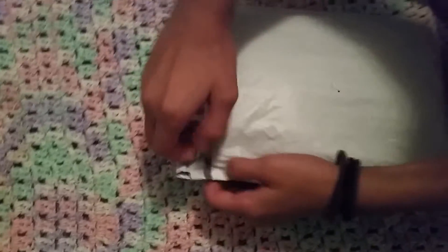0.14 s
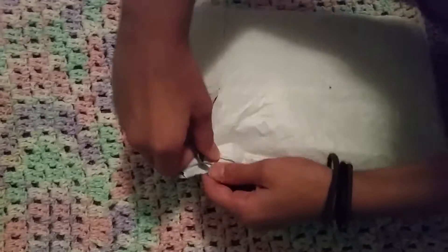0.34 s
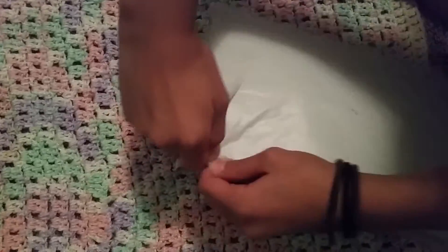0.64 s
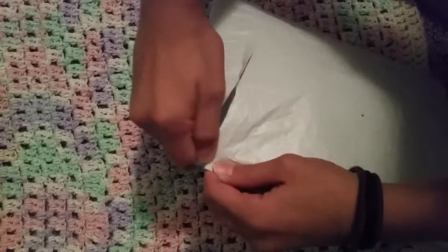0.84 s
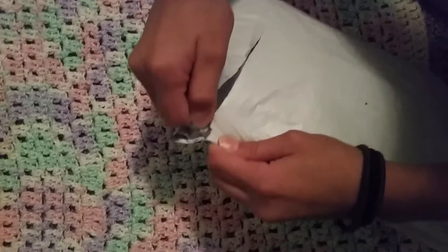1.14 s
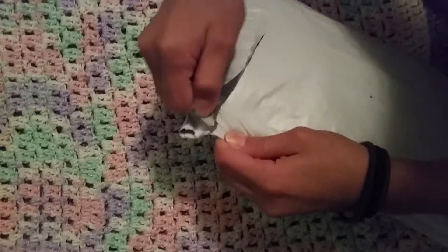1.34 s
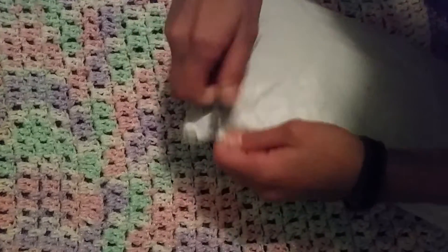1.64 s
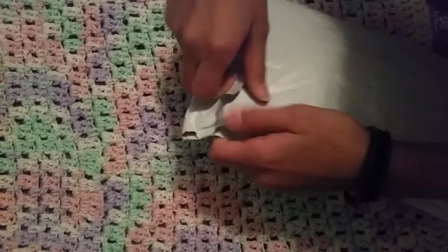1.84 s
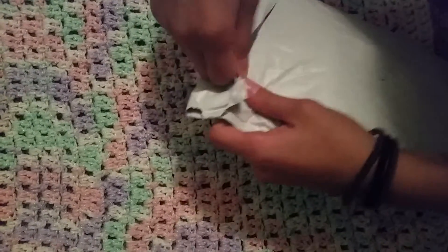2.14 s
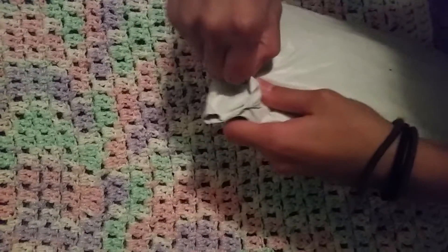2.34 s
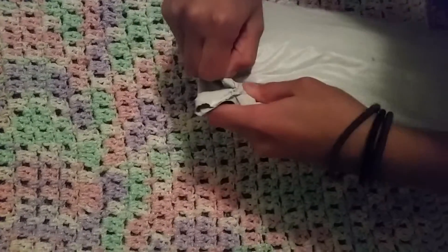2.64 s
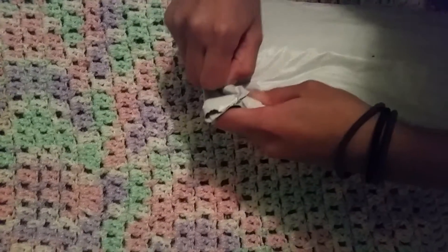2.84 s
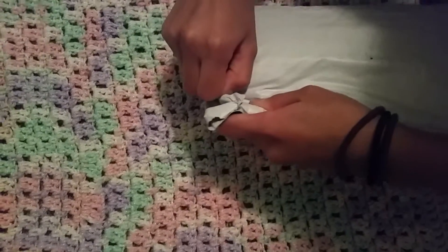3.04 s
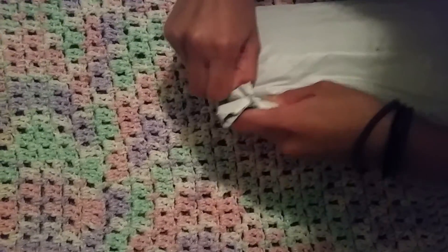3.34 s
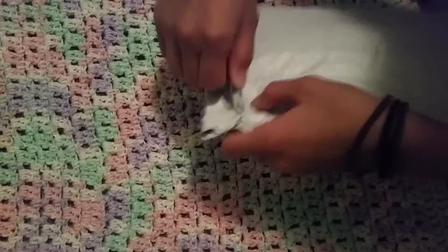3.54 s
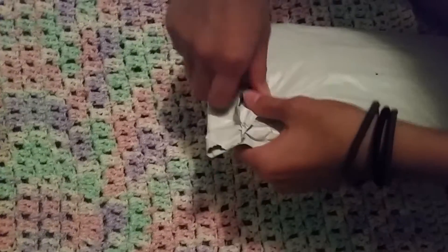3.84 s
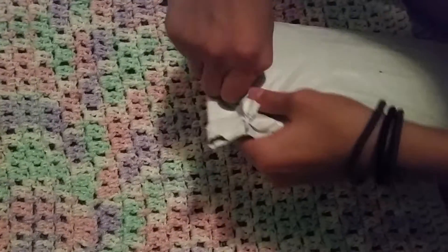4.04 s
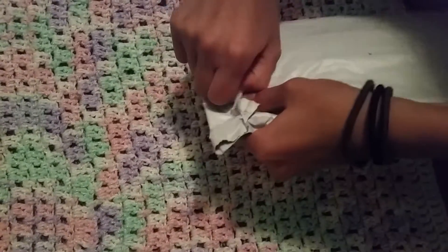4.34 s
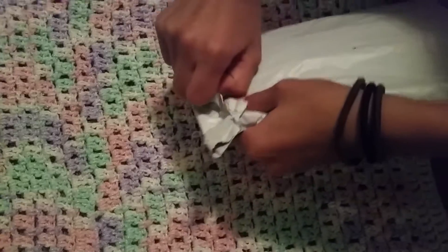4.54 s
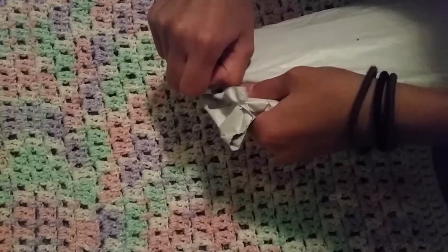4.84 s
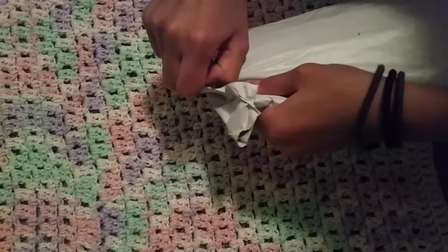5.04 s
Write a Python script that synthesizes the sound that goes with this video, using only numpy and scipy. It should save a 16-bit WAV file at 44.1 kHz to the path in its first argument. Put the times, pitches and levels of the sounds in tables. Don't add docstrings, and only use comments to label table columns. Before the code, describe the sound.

Close to a phone in a quiet room, fingers work the corner of a padded plastic envelope on a blanket. Dry rustling and tiny crackles run unevenly, with a sharp cluster near 0.7 seconds, a calmer spell, then a strong creaking tug and snaps just after 2 seconds. Fine crinkles follow, another hard burst comes near 4 seconds, and lighter ticking continues to the end over faint hum.

```python
import sys
import numpy as np
from scipy import signal
from scipy.fft import rfft, irfft
from scipy.io import wavfile

SR = 44100
rng = np.random.default_rng(int(sys.argv[2]) if len(sys.argv) > 2 else 0)


def decibels_to_gain(level_db):
    exponent = np.asarray(level_db, float) / 20
    return 10 ** exponent


def dump_mix(stems):
    frames = np.atleast_2d(stems).T
    limited = np.clip(frames, -1, 1)
    pcm = np.round(limited * 32767).astype(np.int16)
    wavfile.write(sys.argv[1], SR, pcm)


N = 229577

# low_hz, high_hz
BANDS_HZ = [
    (3400, 11000),
    (11000, 17000),
    (950, 3400),
    (220, 950),
]
# start_s, body_db, sizzle_db, knock_db, pitch_hz
LOUD_SNAPS = [(.1722, -27, -28, -38, 5750), (.233, -26, -24, -45, 7100), (.693, -18.5, -16, -30, 6250),
              (.7052, -21, -15.5, -26.5, 7260), (.7275, -42, -10, -53, 8800), (1.74, -38, -15.5, -36, 6600),
              (1.9271, -24.5, -24, -34.5, 7100), (2.214, -15, -15, -47, 6840),
              (2.2203, -11.5, -21, -26.5, 4860), (2.3, -18.5, -39, -43, 6340),
              (2.4976, -23.5, -23, -34, 9000), (2.8621, -25, -25, -39, 9050), (3.0201, -27, -32, -24, 7050),
              (3.1536, -21, -21, -32.5, 6000), (3.6026, -21.5, -19, -37.5, 7150),
              (3.6513, -31, -14, -38, 7160), (4.0256, -16, -20, -25.5, 6170),
              (4.0354, -15.5, -18, -34, 5700), (4.0443, -19.5, -29, -26.5, 5500),
              (4.0717, -15, -7.5, -61, 8950), (4.0976, -27, -20, -33, 7300),
              (4.3993, -23.5, -22, -35, 7200), (4.6054, -16, -21.5, -60, 6500),
              (4.9628, -15, -17.5, -30.5, 6600)]
# start_s, film_db, knock_db
CRACKS = [(0.182, -36, -35), (0.4333, -45, -38.5), (0.5563, -25, -58), (.634, -23, -36), (0.682, -24, -47),
          (0.7694, -30, -43), (0.899, -37, -31), (.996, -29.5, -25.5), (1.022, -35, -36), (1.032, -31, -45),
          (1.0648, -27.5, -39), (1.114, -31, -44), (1.1975, -33.5, -33), (1.594, -32, -36.5),
          (1.769, -42, -40), (1.9723, -27, -36), (2.114, -39, -42), (2.165, -22, -37), (2.227, -28, -52),
          (3, -36, -42), (3.0593, -29, -30.5), (3.068, -28.5, -53), (3.093, -28.5, -52), (3.3735, -25, -39),
          (3.8867, -27, -60), (3.8948, -26.5, -34.5), (4.0503, -20.5, -35), (4.1056, -28, -40),
          (5.013, -21.5, -37), (5.126, -23, -43)]
# start_s, body_db, knock_db
MUFFLED = [(0.074, -50, -34), (0.101, -39, -34), (0.356, -60, -40), (.403, -32.5, -37), (0.976, -48, -33),
           (1.126, -36, -68), (1.7023, -48, -33.5), (1.904, -27, -46), (2.2446, -28, -45),
           (2.353, -42, -32), (2.4103, -43, -34), (2.4283, -46, -29), (2.5618, -50, -30.5),
           (2.783, -47, -35), (2.8913, -26, -37), (2.953, -50, -35), (3.2204, -29.5, -35.5),
           (3.3567, -23, -46), (3.4923, -60, -32.5), (3.9163, -39, -33.5), (4.1607, -49, -40),
           (4.329, -43, -36.5), (4.6718, -30, -35.5), (4.7547, -31, -41), (4.877, -41, -37),
           (4.937, -27, -60), (5.0858, -31, -37.5), (5.1463, -27, -39), (5.153, -26, -48),
           (5.204, -24, -38)]
# start_s, sizzle_db
SPARKS = [(.017, -25.5), (0.538, -26), (0.991, -38), (1.2735, -27), (2.082, -19.5), (2.106, -19),
          (2.1806, -27), (2.182, -31), (2.461, -20.5), (2.585, -23), (2.6978, -24), (3.136, -17.5),
          (3.1798, -22), (3.584, -27), (3.601, -23), (3.6763, -28), (3.9007, -27), (4.0798, -17),
          (4.346, -27), (4.651, -30), (5.1728, -26), (5.187, -31)]
# start_s, peak_db
KNOCKS = [(0.0568, -41), (0.1815, -25.5), (0.209, -38), (0.4294, -33.5), (0.9157, -30.5), (1.042, -37),
          (1.1068, -43), (1.142, -42), (1.3692, -41), (1.439, -41), (1.499, -38), (1.5545, -38),
          (1.6356, -33), (1.8178, -59), (1.8512, -56), (2.071, -30), (2.083, -43), (2.2417, -38),
          (2.275, -34), (2.2907, -30), (2.3218, -25.5), (3.7818, -33), (3.834, -39.5), (3.8492, -39),
          (3.8768, -41), (4.001, -45), (4.151, -34), (4.274, -36), (4.4194, -35), (4.4459, -33)]
# start_s, peak_db
TICKS = [(0.251, -27), (.5663, -34), (0.957, -25), (1.2378, -27), (1.498, -46), (2.1284, -34),
         (2.1993, -16), (2.511, -28), (2.522, -29), (3.217, -30), (3.232, -27), (4.148, -30), (4.1807, -33),
         (4.191, -27.5), (4.235, -36), (4.323, -31), (4.585, -25), (4.693, -23), (4.7352, -26.5),
         (4.854, -30), (4.916, -31), (4.941, -41), (4.994, -29), (5.029, -25), (5.067, -31), (5.0436, -34),
         (5.0543, -29), (5.1063, -39), (4.9762, -33)]
# start_s, body_db, sizzle_db
FINE = [(0.0339, -36, -43), (0.1647, -33.5, -41), (0.2997, -39, -44), (0.3307, -40, -31),
        (0.4749, -39, -41), (0.577, -37, -38), (0.67, -30, -42), (0.718, -41, -26), (0.8067, -41, -43),
        (0.843, -45, -48), (0.8513, -40, -40), (0.8536, -36, -43), (0.9282, -30.5, -46), (0.9342, -34, -40),
        (1.0068, -45, -38), (1.0423, -31, -38), (1.0917, -42, -44), (1.178, -37, -52), (1.1851, -45, -46),
        (1.2096, -34, -46), (1.2998, -45, -49), (1.3413, -44, -51), (1.6216, -38, -40), (1.6256, -38, -44),
        (1.6393, -46, -42), (1.6562, -53, -44), (1.807, -50, -45), (1.8287, -54, -50), (1.842, -37, -32),
        (1.9597, -40, -39), (2.0474, -31, -37), (2.115, -30, -27), (2.276, -36, -45), (2.3538, -27, -40),
        (2.4087, -36, -33), (2.632, -28, -34), (2.6603, -34, -36), (2.698, -30, -33), (2.7415, -30, -42),
        (2.7641, -38, -37), (2.8158, -30, -34), (2.8296, -37, -46), (2.8428, -41, -44), (2.9333, -33, -32),
        (2.9872, -40, -42), (3.0366, -28, -45), (3.0403, -27.5, -36), (3.0817, -37, -31), (3.087, -34, -39),
        (3.1744, -40, -42), (3.243, -38, -41), (3.3246, -42, -41), (3.4503, -48, -50), (3.4826, -43, -47),
        (3.5151, -38, -49), (3.8773, -25, -36), (3.8835, -30, -43), (4.0773, -29, -26), (4.1068, -27, -29),
        (0.0051, -32.5, -43), (0.5658, -44, -35), (0.647, -38, -32), (0.9908, -48, -34),
               (1.1621, -52, -45), (1.4019, -41, -43), (1.5425, -39, -29), (1.6932, -42, -35),
               (1.962, -37, -34), (2.1837, -34, -19), (2.5861, -32, -26), (2.6128, -42, -31),
               (2.796, -45, -33), (3.016, -28, -32), (3.275, -47, -43), (3.4182, -39, -36),
               (3.4315, -45, -42), (3.457, -42, -47), (3.4739, -54, -43), (3.649, -31, -22),
               (3.7273, -48, -37), (3.7429, -37, -40), (3.792, -31, -40), (3.8906, -28, -32),
               (3.9276, -42, -37), (3.9624, -37, -28), (3.982, -35, -35), (4.023, -39, -35),
               (4.0869, -27, -23), (4.2014, -47, -44), (4.219, -40, -46), (4.232, -40, -32),
               (4.2443, -42, -44), (4.2547, -41, -44), (4.263, -45, -41), (4.2969, -45, -40),
               (4.2971, -46, -43), (4.3227, -40, -34), (4.3596, -40, -44), (4.416, -37, -43),
               (4.4361, -40, -44), (4.4674, -42, -46), (4.4929, -50, -52), (4.558, -35, -43),
               (4.574, -33.5, -37), (4.5914, -48, -43), (4.6296, -48, -44), (4.6512, -32, -38),
               (4.7143, -40, -48), (4.7438, -30, -50), (4.7802, -35, -47), (4.7863, -38, -50),
               (4.792, -42, -56), (4.8101, -43, -53), (4.8379, -36, -46), (4.8642, -33, -61),
               (4.8716, -44, -49), (4.9034, -50, -45), (4.9035, -51, -45), (4.943, -35, -44)]
# start_s, knock_db
DENTS = [(0.0604, -41), (0.0962, -34.5), (0.2715, -40), (0.2994, -39), (0.337, -43), (0.4631, -42),
         (0.6054, -40), (0.647, -32), (0.7532, -40), (0.8546, -56), (1.148, -45), (1.4013, -45),
         (1.417, -46), (1.6716, -50), (1.735, -34), (1.901, -39), (2.0368, -45), (2.0446, -43),
         (2.0743, -40), (2.082, -40), (2.1637, -24), (2.3563, -38), (2.4607, -33), (2.5343, -42),
         (2.6433, -39), (2.6594, -33.5), (2.7322, -39), (2.7415, -33), (2.963, -43), (3.0165, -39),
         (3.0366, -29), (3.094, -44), (3.1798, -43), (3.3146, -49), (3.3679, -45), (3.4383, -53),
         (3.6687, -35), (3.879, -43), (4.085, -32.5), (4.4694, -41), (4.608, -42), (4.7788, -45),
         (4.864, -43), (5.1236, -43), (5.1871, -33.5)]
# middle_s, half_length_s, body_db, knock_above_body_db
MOVES = [(0.01, 0.068, -53, -1), (0.212, 0.081, -49, 1.5), (0.446, 0.071, -55.5, 3.5),
         (0.605, 0.082, -52, -3.5), (0.722, 0.086, -46.5, -0.5), (0.912, 0.07, -55.5, 1),
         (1.042, 0.039, -50, -0.5), (1.153, 0.14, -59.5, 2.5), (1.552, 0.066, -51.5, -1.5),
         (1.747, 0.031, -50, 0.5), (1.88, 0.33, -57.5, 2.1), (2.238, 0.11, -40.5, 1),
         (2.303, 0.26, -50, -2), (2.547, 0.18, -48.5, -2), (2.69, 0.067, -43.5, -3), (2.83, 0.13, -55, -2),
         (3.025, 0.059, -47, -1.5), (3.17, 0.23, -56, 0.5), (3.53, 0.063, -56, 3.5), (3.654, 0.048, -45, 1),
         (3.766, 0.056, -51, -2), (3.898, 0.03, -45, -3), (3.977, 0.056, -50, -8.5),
         (4.078, 0.031, -40.5, -8), (4.38, 0.28, -53.5, -2.1), (4.704, 0.12, -53.5, -5),
         (5.026, 0.054, -52, -4), (5.2, 0.071, -47, -3)]
# middle_s, change_db
SURGES = [(.01, 0), (.155, 1), (.235, 7), (.258, 1.5), (.39, -6.5), (.47, 0), (.531, 1.5), (.807, -5),
          (.842, -2.5), (0.927, 8), (.961, 2), (1.102, -3), (1.267, -2.5), (1.351, -2), (1.417, 5),
          (1.447, 3), (1.52, 3), (1.593, 3), (1.746, 3.5), (1.85, -8.5), (1.939, 4), (2.015, -3.5),
          (2.044, 3), (2.346, 2.5), (2.585, -4), (2.843, -4), (3.126, -4.5), (3.244, 2), (3.307, -2),
          (3.625, -1.5), (3.663, 4), (3.705, -1.5), (3.776, -1.5), (4.167, 1.5), (4.271, -2), (4.505, -1),
          (4.663, -8), (4.724, -1.5), (4.791, -4), (4.832, -3), (5.139, 1)]
# start_s, level_db
SLIPS = [(.056, -33), (0.182, -32.5), (0.186, -35), (.2, -34.5), (0.2327, -29), (.244, -32.5),
         (0.441, -34.5), (0.458, -37), (0.636, -34.5), (0.683, -36), (1.022, -35.5), (1.754, -29.5),
         (1.768, -37.5), (1.92, -33.5), (2.2147, -28.5), (2.294, -32.5), (2.426, -30.5), (2.5866, -29),
         (2.953, -31), (3.038, -34), (3.06, -44), (3.154, -36.5), (3.482, -31.5), (4.084, -36),
         (4.1008, -31.5), (4.329, -39.5), (4.446, -38), (4.671, -38), (4.963, -34.5), (5.028, -37.5)]
# pitch_hz, level_db, t60_s
WALL_MODES = [(409, -5.5, 0.038), (534, 5.5, 0.012), (630, -8.5, 0.012), (803, 4.5, 0.012),
              (1100, -1, 0.018), (1430, 3.5, 0.0048), (2050, 0.5, 0.023)]
# start_s, level_db
LONG_PULL = [(2.1137, -25), (2.1173, -25.5), (2.1222, -25), (2.1342, -25), (2.147, -24), (2.1555, -21),
             (2.163, -22), (2.1694, -22), (2.1748, -22), (2.178, -25), (2.1816, -29), (2.1837, -24),
             (2.1865, -21), (2.1895, -26), (2.1918, -28), (2.1937, -27)]
SOFT_PULL = [(3.6516, -22), (3.659, -26), (3.6615, -23)]
LAST_PULL = [(4.0263, -23), (4.036, -23), (4.044, -28), (4.05, -28.5)]
# pitch_factor, contact_cutoff_hz, slack_low_mode_db, taut_middle_modes_db, bass_edge_hz
GRIPS = [
    (1.12, 2500, -4, 4.5, 310),
    (0.99, 1100, 0, -4, 235),
    (0.96, 2800, 6, 5, 260),
]
# time_s, level_db
HUM = [(0.0, -45), (0.13, -41), (0.29, -45.5), (0.33, -43.5), (0.93, -49), (0.98, -46), (2.92, -48.5),
       (3.19, -43.5), (3.3, -47), (4.02, -45.5), (4.08, -52), (4.13, -47.5), (4.72, -52), (5.2, -48)]
# frequency_hz, density_db (per Hz)
HUM_SHAPE = [(7.1, -56), (12, -46), (38, -7), (80, -4.5), (102, 6.5), (123, -7), (157, -14.5), (221, -11),
             (283, -27), (392, -21.5), (600, -27), (780, -101), (1320, -120)]
# frequency_hz, left_db, right_db
PORTS = [(300, 1.5, -2), (630, 0.5, -5), (1044, -7.5, -18.5), (1370, -2, -5.5), (1970, -1.75, -13),
         (2700, -6, -18), (4100, -6.5, -15), (5760, 1, -7.5), (7600, -4.5, -12.5), (7560, 0.5, -16.5),
         (9950, -3.5, -11), (11600, -10, -7), (13900, -8.5, 2)]
# middle_s, dip_db
DUCKS = [(2.207, -9), (4.060, -10), (4.067, -26), (3.149, -5)]
# frequency_hz, level_db
TOP_EDGE = [(14550, 0.1), (14900, -24), (15600, -37), (16300, -58), (16700, -80)]

RISE_S, SNAP_T60S = .0004, (.0026, .002, .006)
FLUTTER_DB, FLUTTER_T60 = -20, .022
KNOCK_HZ, KNOCK_SPREAD_HZ, KNOCK_WIDTH_HZ, KNOCK_SKIRT_DB = 1790, 510, 880, -6.5
CREASE_HZ, CREASE_SPREAD_HZ = 6590, 2140
MUFFLE_DB, SPARK_BODY_DB, SPARK_KNOCK_DB, SPARK_HZ = -14, -9.5, -48, 8200
KNOCK_TRIM_DB, KNOCK_FILM_DB = -2.5, -2
FINE_TRIM_DB, FINE_KNOCK_DB, DENT_TRIM_DB, DENT_FILM_DB = 1.5, -19.5, -3, -10
REST_DB, REST_KNOCK_DB, SIZZLE_UNDER_DB = -61.5, -61, -2
CLUMP_HZ, CLUMP_DB = 23.8, 0.93
RUMBLE_FOLLOWS = 0.86
SURGE_S, DUCK_S = 0.012, .0035


def in_time(rows):
    s, *columns = np.transpose(rows)
    return np.array([np.interp(np.arange(N) / SR, s, c) for c in columns])


def rms_one(x):
    return x / np.sqrt(np.mean(x ** 2) + 1e-20)


def band(x, edges_hz):
    return signal.sosfilt(signal.butter(3, edges_hz, "band", fs=SR, output="sos"), x)


def drift(rate_hz):
    r = np.exp(-2 * np.pi * rate_hz / SR)
    noise = rng.standard_normal(N + 9000)
    return rms_one(signal.lfilter([1], [1, -2 * r, r * r], noise)[9000:])


def ring(clicks, hz, t60):
    r, w = decibels_to_gain(-60 / (t60 * SR)), 2 * np.pi * hz / SR
    return signal.lfilter([0, np.sin(w)], [1, -2 * r * np.cos(w), r * r], clicks + 1e-18)


def two_ears(mid, side, alike):
    alike = np.clip(alike, 0, 1)
    return np.sqrt((1 + alike) / 2) * mid + np.sqrt((1 - alike) / 2) * side * [[1], [-1]]


def snaps(rows, trim_db=(4, 6, 8), alike=(.3, .05, .6), width_hz=1500, skirt_db=-14, crack=2.93):
    size = 900
    rows, t = np.array(rows), np.arange(size) / SR
    mid, side = rng.standard_normal((len(rows), 2, 1, size)).swapaxes(0, 1)
    flip = round(RISE_S * SR)
    mid[..., flip] += crack
    side[..., flip] -= crack
    at = np.round((rows[:, :1] - RISE_S / 2) * SR).astype(int) + np.arange(size)

    hz = np.fft.rfftfreq(size, 1 / SR)
    body_colour = decibels_to_gain(skirt_db) + np.exp(-((hz - rows[:, 4:]) / width_hz) ** 2 / 2)
    knock_hz = KNOCK_HZ + KNOCK_SPREAD_HZ * np.clip(rng.standard_normal((len(rows), 1)), -2, 2)
    knock_colour = decibels_to_gain(KNOCK_SKIRT_DB) + np.exp(-((hz - knock_hz) / KNOCK_WIDTH_HZ) ** 2 / 2)
    colours = [body_colour, None, knock_colour]

    out = np.zeros((2, N + size))
    flutter = decibels_to_gain(FLUTTER_DB - 60 * t / FLUTTER_T60)
    for k, colour in enumerate(colours):
        shape = np.minimum(t / RISE_S, 1) ** 2 * (decibels_to_gain(-60 * t / SNAP_T60S[k]) + flutter)
        burst = band(two_ears(mid, side, alike[k]) * shape, BANDS_HZ[k])
        if colour is not None:
            burst = irfft(rfft(burst) * colour[:, None], size)
        peak = np.abs(burst).max(axis=2, keepdims=True)
        burst = burst / peak * decibels_to_gain(rows[:, k + 1] + trim_db[k])[:, None, None]
        for c in range(2):
            out[c] += np.bincount(at.ravel(), burst[:, c].ravel(), N + size)
    return out[:, :N]


def with_pitch(small):
    chance = np.clip(rng.standard_normal(len(small)), -1.5, 1.5)
    return [(*row, hz) for row, hz in zip(small, CREASE_HZ + CREASE_SPREAD_HZ * chance)]


def creases():
    small = [(s, db, db, knock) for s, db, knock in CRACKS]
    small += [(s, db, db + MUFFLE_DB, knock) for s, db, knock in MUFFLED]
    small += [(s, db + KNOCK_FILM_DB, db + KNOCK_FILM_DB, db + KNOCK_TRIM_DB) for s, db in KNOCKS]
    sparks = [(s, db + SPARK_BODY_DB, db, db + SPARK_KNOCK_DB, SPARK_HZ) for s, db in SPARKS]
    return LOUD_SNAPS + with_pitch(small) + sparks


def ticks(tick_db=(-6, -6, -20), tick_hz=7000):
    return [(s, *(peak_db + np.array(tick_db)), tick_hz) for s, peak_db in TICKS]


def faint_creases():
    small = [(s, body_db + FINE_TRIM_DB, sizzle_db + FINE_TRIM_DB, body_db + FINE_KNOCK_DB)
             for s, body_db, sizzle_db in FINE]
    small += [(s, db + DENT_FILM_DB, db + DENT_FILM_DB, db + DENT_TRIM_DB) for s, db in DENTS]
    return with_pitch(small)


def rustle(per_s=650, spread_db=0.0, colour_db=5, grain_s=(.0003, .0003, .0006, .0015),
           hiss_db=(-2.5, -2.5, -3, -4), trim_db=(5.5, 6.5, 2.2, -1.5), alike=(.1, .02, .4, .5)):
    out, clumps = 0, drift(CLUMP_HZ)
    body_db, sizzle_db, knock_db = stirring() + surges()
    rumble_db = REST_KNOCK_DB + RUMBLE_FOLLOWS * (knock_db - REST_KNOCK_DB)
    born = rng.random(N) < per_s * decibels_to_gain(2 * CLUMP_DB * clumps) / SR
    sizes = born * decibels_to_gain(spread_db * np.minimum(rng.exponential(1, N), 3.5))
    for k, level_db in enumerate([body_db, sizzle_db, knock_db, rumble_db]):
        coloured = sizes * decibels_to_gain(colour_db * np.clip(rng.standard_normal(N), -3, 1.5))
        r = np.exp(-1 / (grain_s[k] * SR))
        puffs = rms_one(signal.lfilter([1], [1, -2 * r, r * r], coloured)) + decibels_to_gain(hiss_db[k])
        mid, side = rms_one(band(puffs * rng.standard_normal((2, N)), BANDS_HZ[k]))
        gain = decibels_to_gain(level_db + trim_db[k] + CLUMP_DB * (clumps + drift(18)))
        out = out + gain * two_ears(mid, side, alike[k])
    return out


def stirring():
    s, half, body_db, knock_db = np.transpose(MOVES)[:, :, None]
    swell = np.exp(-((np.arange(N) / SR - s) / half) ** 2)
    body = 10 * np.log10(decibels_to_gain(2 * REST_DB) + (swell * decibels_to_gain(2 * body_db)).sum(axis=0))
    knock = 10 * np.log10(decibels_to_gain(2 * REST_KNOCK_DB) + (swell * decibels_to_gain(2 * (body_db + knock_db))).sum(axis=0))
    return np.array([body, body + SIZZLE_UNDER_DB, knock])


def surges():
    s, change_db = np.transpose(SURGES)[:, :, None]
    coarse = np.arange(0, N, 32) / SR
    swells_db = (change_db * np.exp(-((coarse - s) / SURGE_S) ** 2)).sum(axis=0)
    return np.interp(np.arange(N) / SR, coarse, swells_db)


def creak(rows, tension=0.99, contact_hz=2800, slack_db=-0.5, taut_db=-0.7, edge_hz=260,
          uneven_db=2.0, trim_db=-8):
    rows, out = np.array(rows), np.zeros(N)
    at = np.round(rows[:, 0] * SR).astype(int)
    grip_db = [slack_db, 0, taut_db, taut_db, 0, 0, 0]
    scatter = rng.standard_normal((len(rows), len(WALL_MODES)))
    for k, (hz, level_db, t60) in enumerate(WALL_MODES):
        clicks = np.zeros(N)
        clicks[at] = decibels_to_gain(rows[:, 1] + level_db + trim_db + uneven_db * scatter[:, k] + grip_db[k])
        out += ring(clicks, hz * tension, t60)
    return band(out, [edge_hz, contact_hz])


def pulls():
    runs = [LONG_PULL, SOFT_PULL, LAST_PULL]
    return sum(creak(rows, *grip, uneven_db=0.0) for rows, grip in zip(runs, GRIPS))


def hum(alike=(.72, .82, .5), trim_db=2.0):
    hz, shape = np.fft.rfftfreq(N, 1 / SR) + 1, np.array(HUM_SHAPE)
    colour = decibels_to_gain(np.interp(np.log(hz), np.log(shape[:, 0]), shape[:, 1]))
    mid, side = rfft(rng.standard_normal((2, N))) * colour
    drone = irfft(two_ears(mid, side, np.interp(hz, [30, 100, 180], alike)), N)
    return decibels_to_gain(in_time(HUM) + trim_db) * rms_one(drone)


def ports(x):
    table, hz = np.array(PORTS), np.linspace(0, SR / 2, 513)
    out = []
    for c in range(2):
        power = decibels_to_gain(2 * np.interp(hz, table[:, 0], table[:, c + 1]))
        taps = signal.minimum_phase(signal.firwin2(511, hz, power, fs=SR))
        out.append(signal.lfilter(taps, 1, x[c]))
    return np.array(out)


def scene():
    film = snaps(creases() + ticks()) + rustle() + creak(SLIPS) + pulls() + snaps(faint_creases())
    left, right = ports(film) + hum()
    return np.array([left, np.roll(right, 2)])


def band_limit(x):
    return signal.sosfilt(signal.butter(12, 15970, fs=SR, output="sos"), x)


def record(dry):
    t = np.arange(N) / SR
    gain_db = sum(dip_db * np.exp(-((t - s) / DUCK_S) ** 2) for s, dip_db in DUCKS)
    slope_db = np.interp(np.fft.rfftfreq(N, 1 / SR), *np.transpose(TOP_EDGE))
    mix = irfft(rfft(dry * decibels_to_gain(gain_db)) * decibels_to_gain(slope_db), N)
    return band_limit(mix)


dry = scene()
out = record(dry)
dump_mix(out)
```